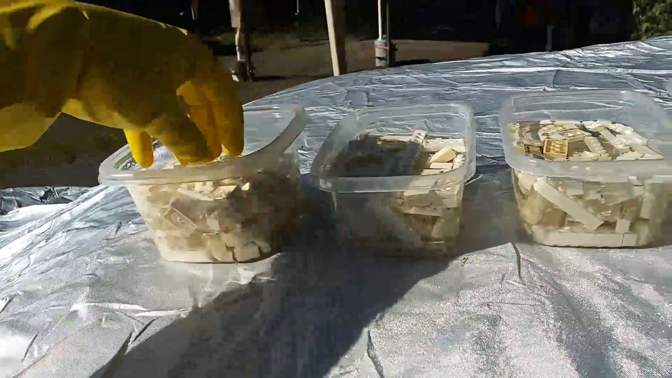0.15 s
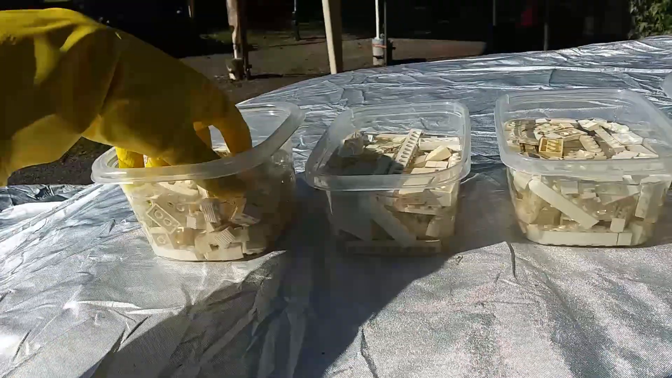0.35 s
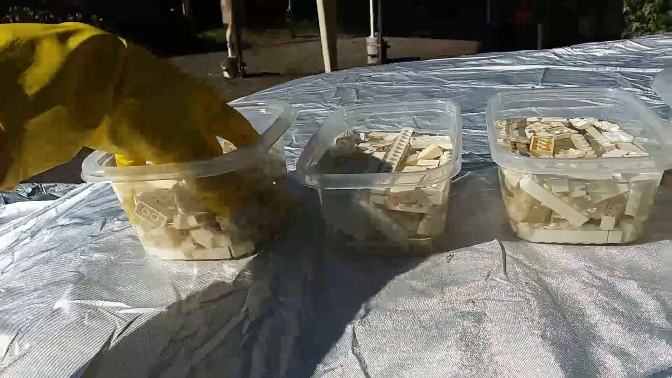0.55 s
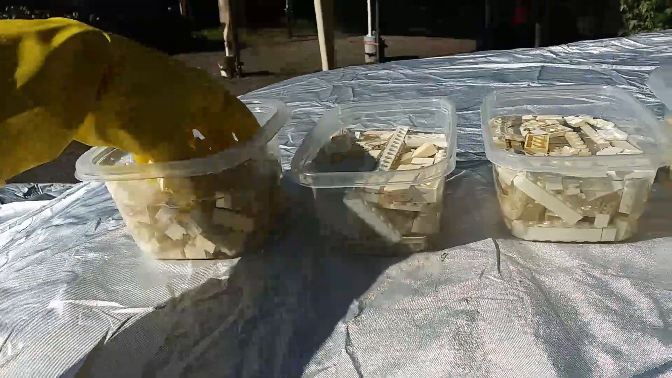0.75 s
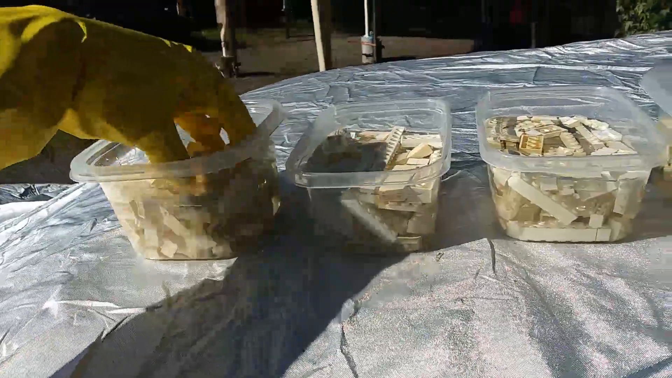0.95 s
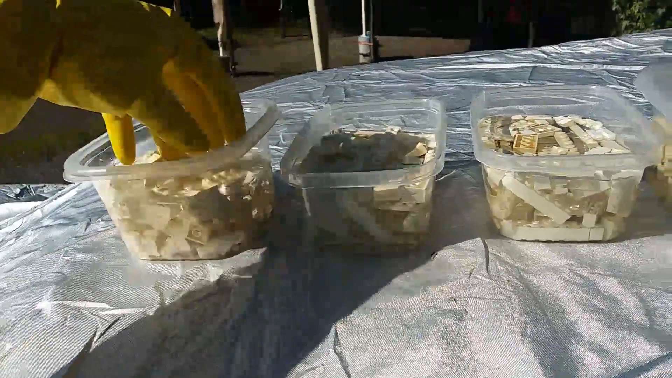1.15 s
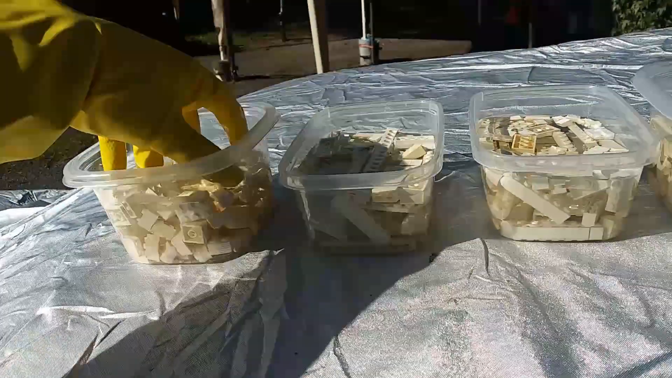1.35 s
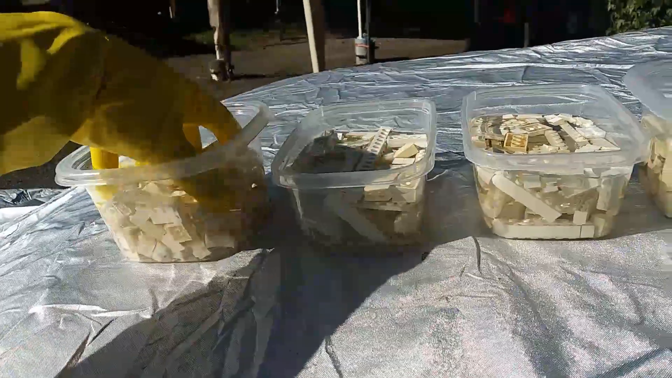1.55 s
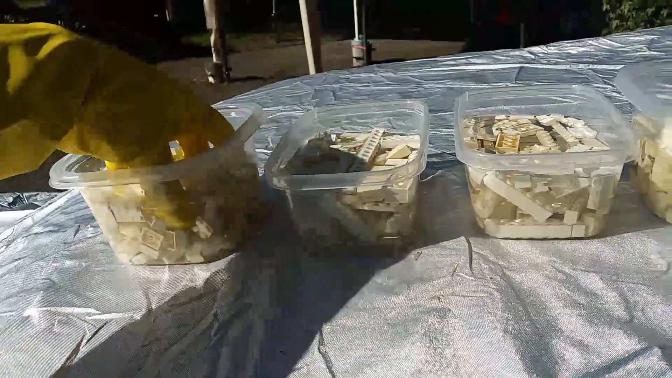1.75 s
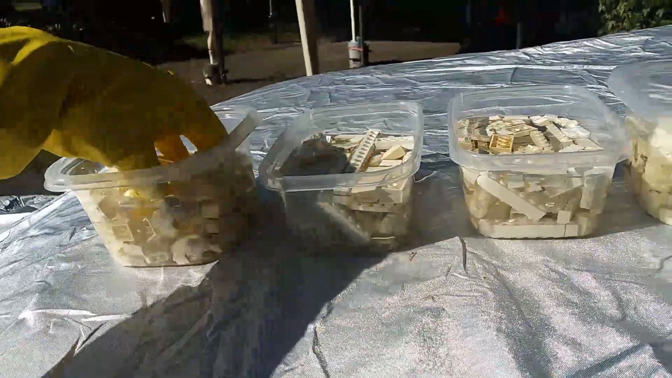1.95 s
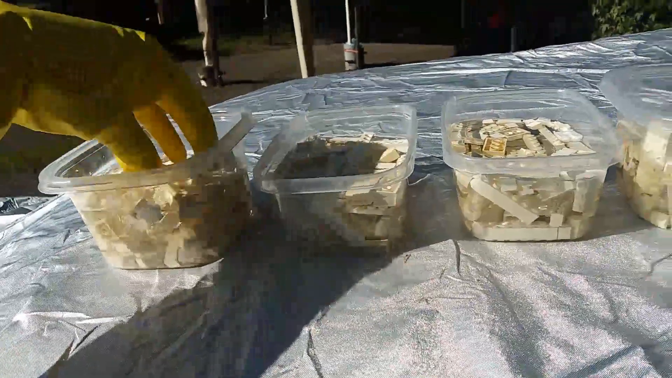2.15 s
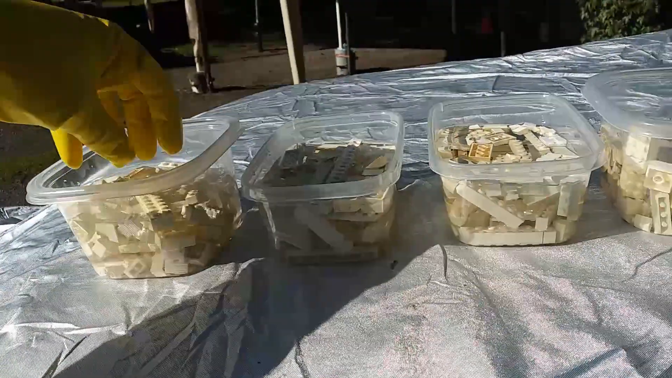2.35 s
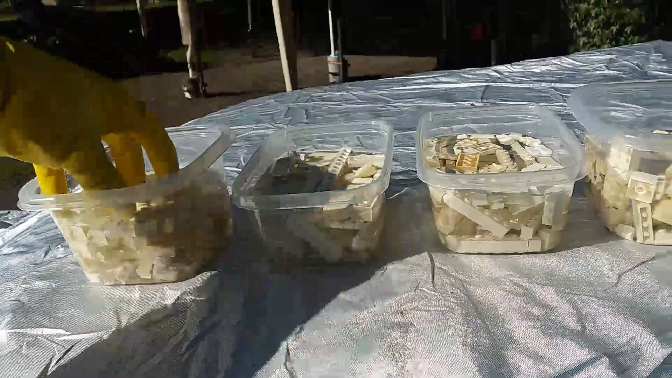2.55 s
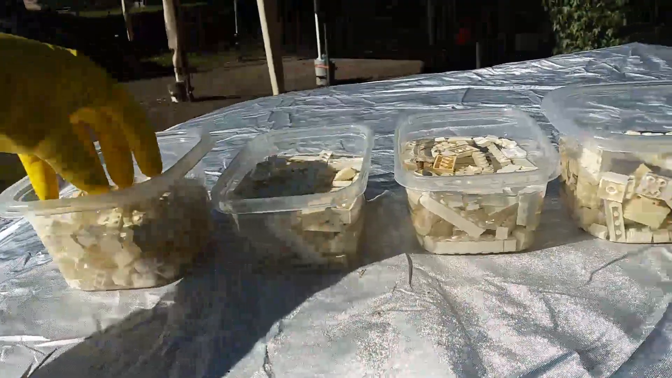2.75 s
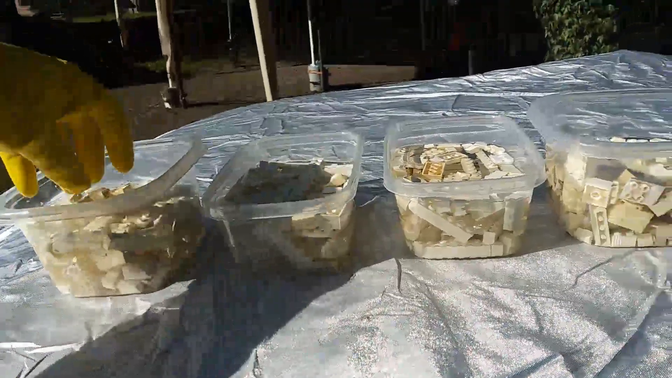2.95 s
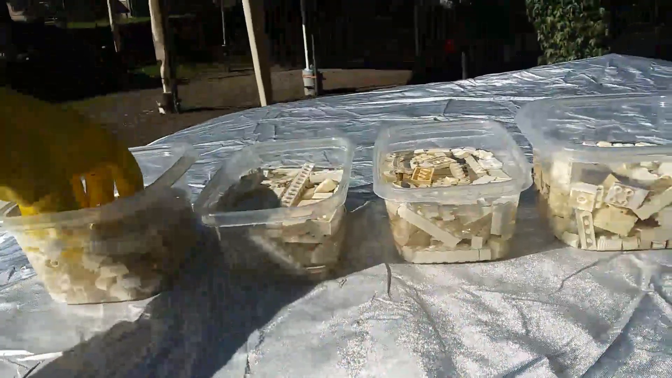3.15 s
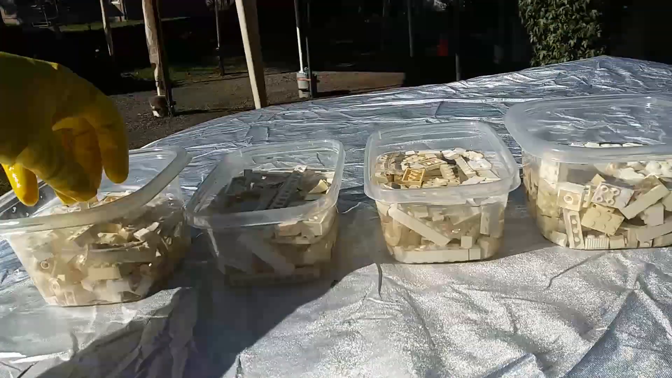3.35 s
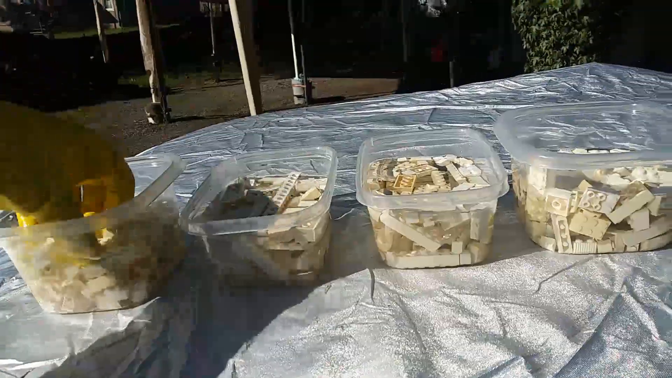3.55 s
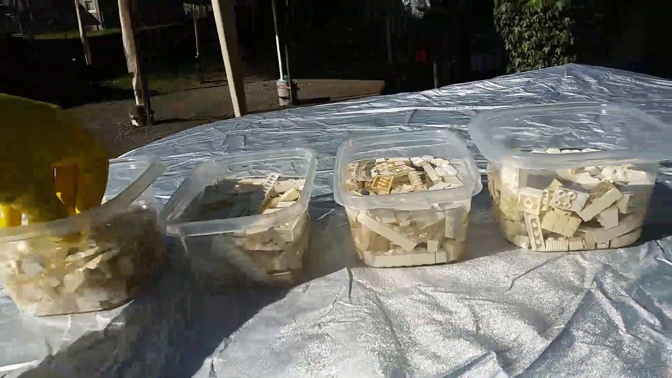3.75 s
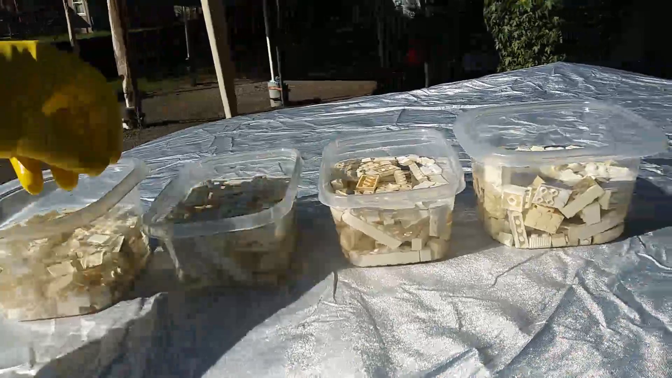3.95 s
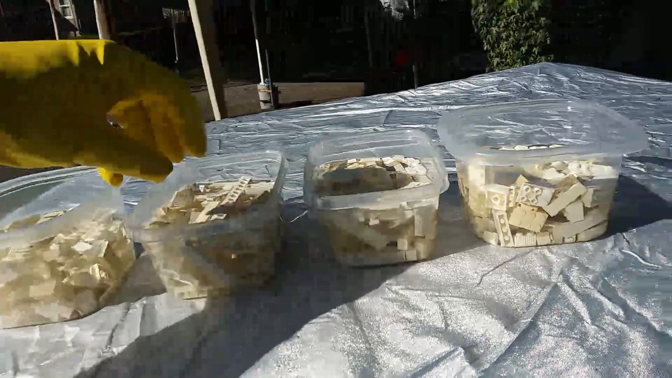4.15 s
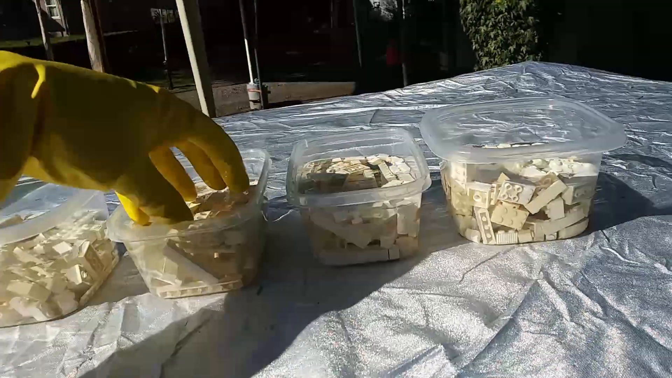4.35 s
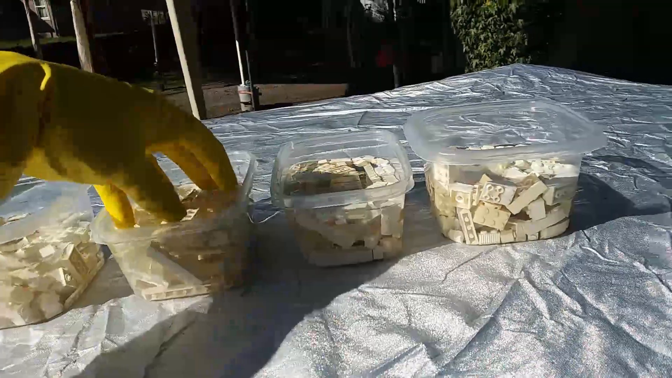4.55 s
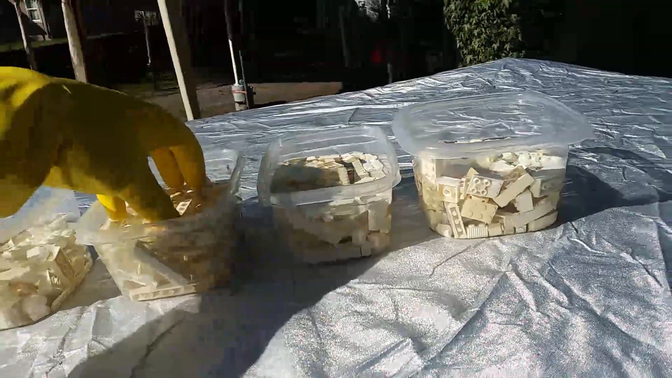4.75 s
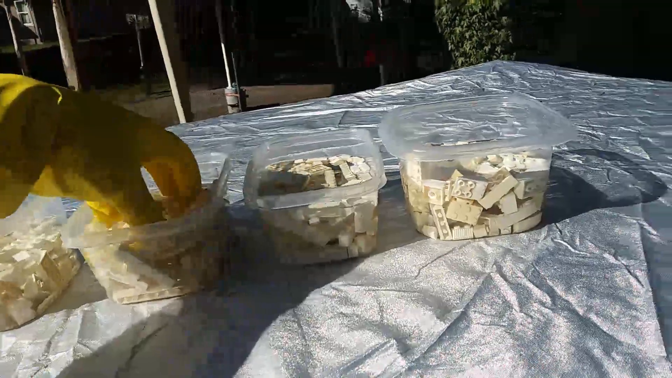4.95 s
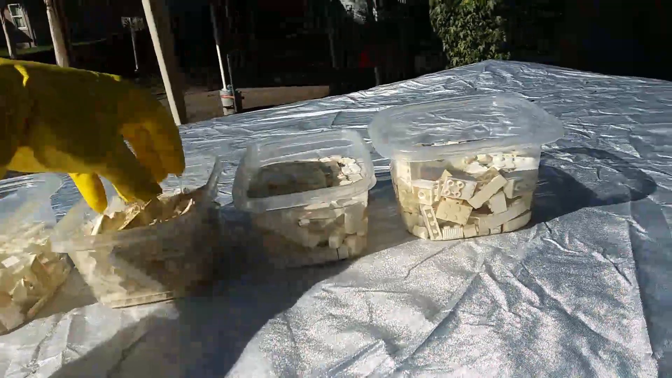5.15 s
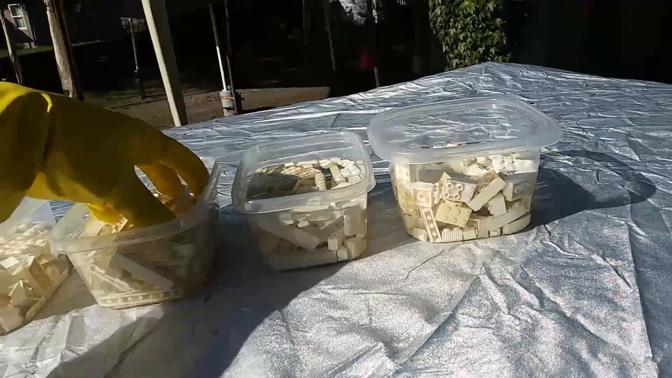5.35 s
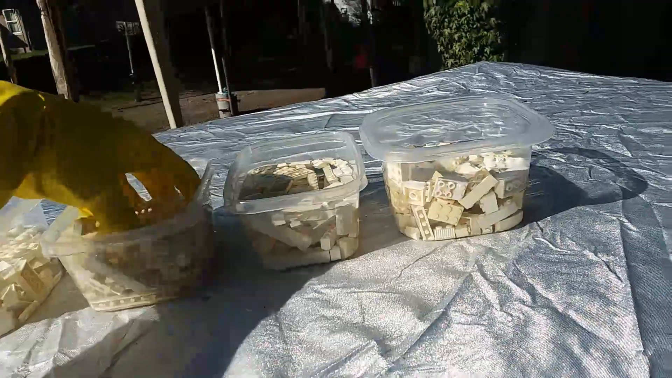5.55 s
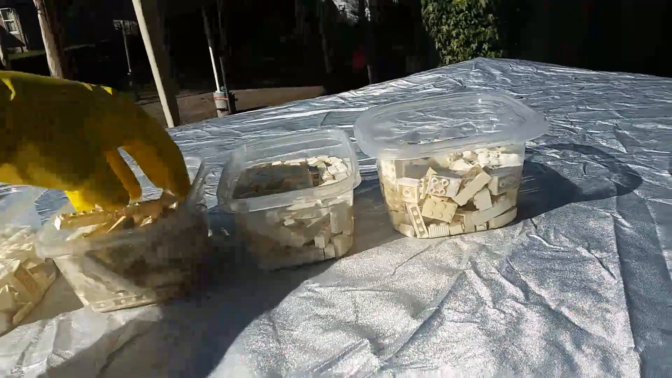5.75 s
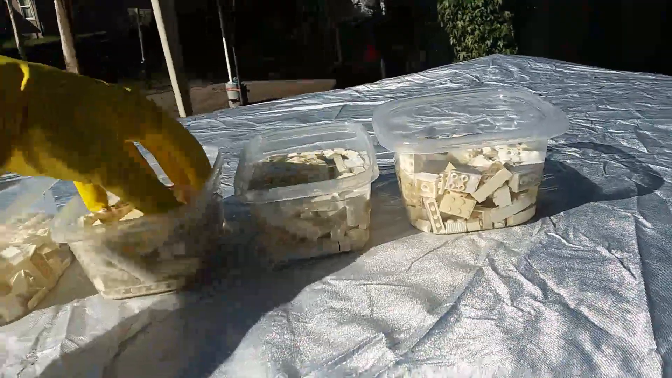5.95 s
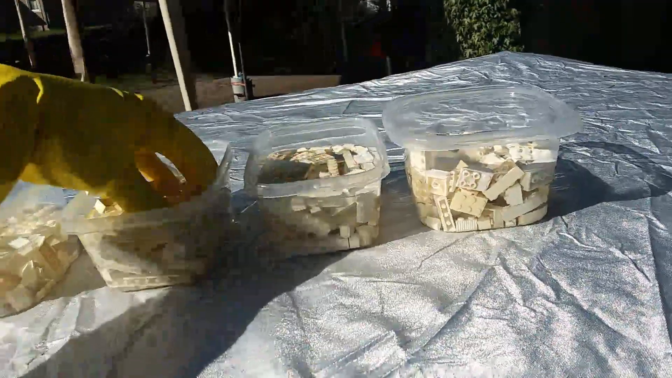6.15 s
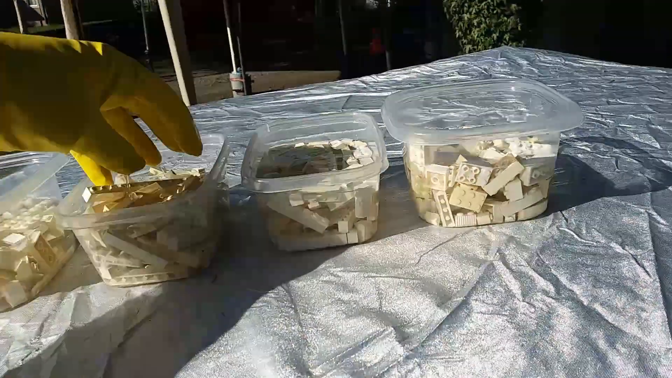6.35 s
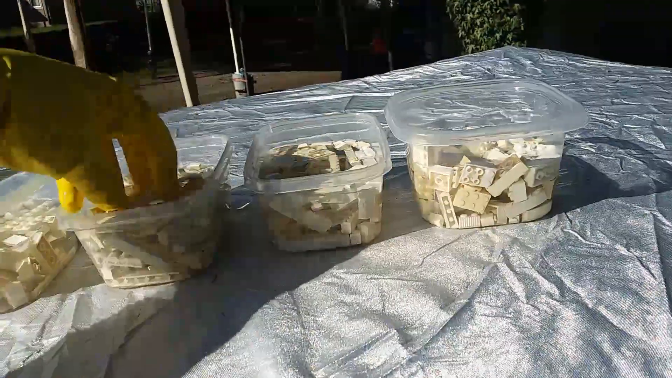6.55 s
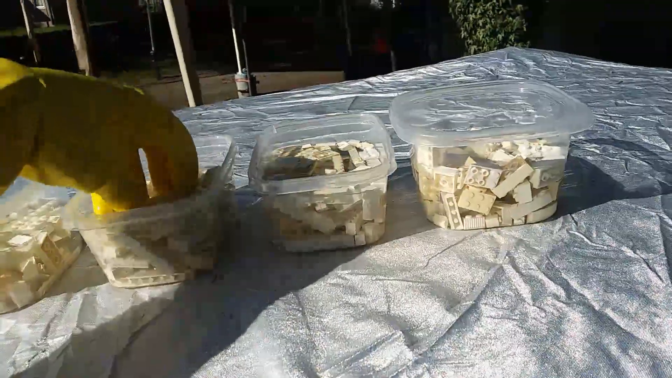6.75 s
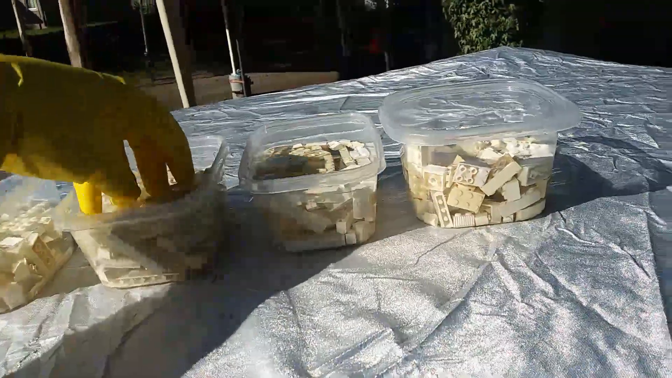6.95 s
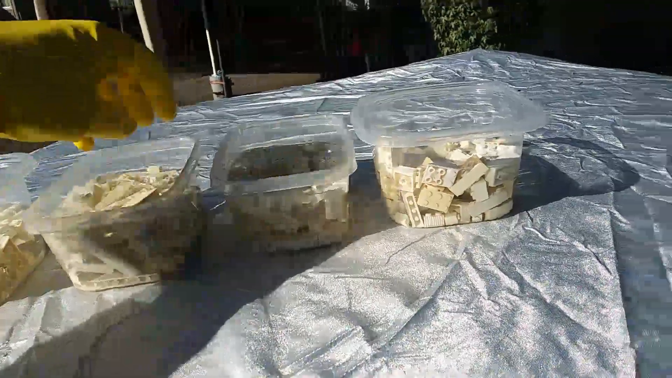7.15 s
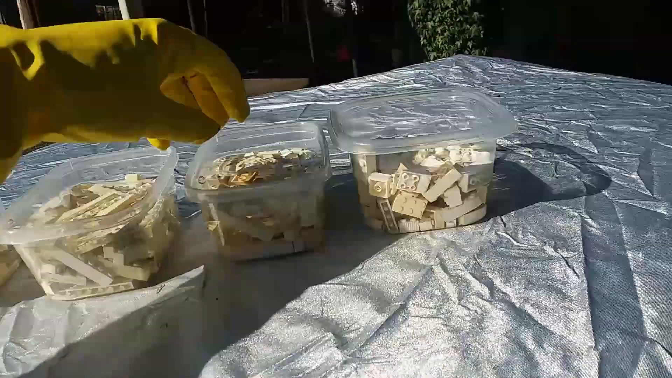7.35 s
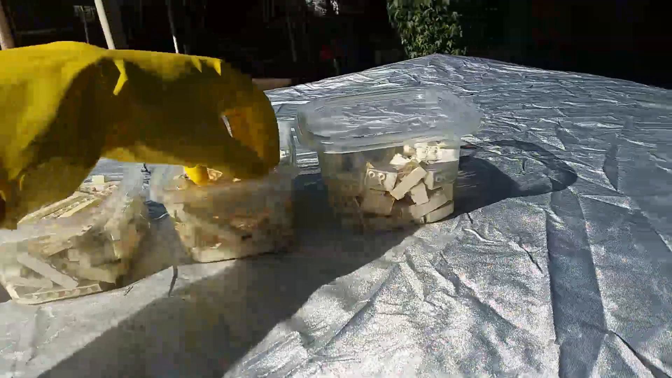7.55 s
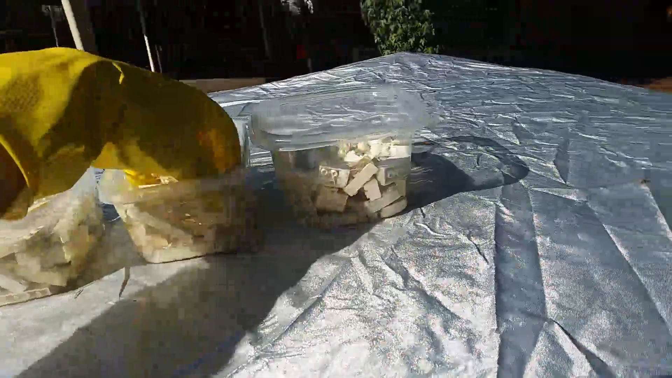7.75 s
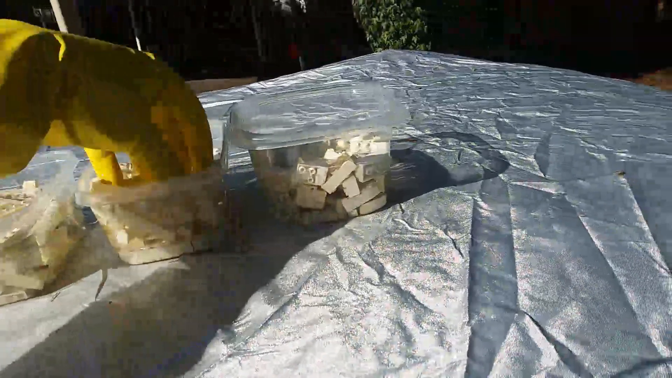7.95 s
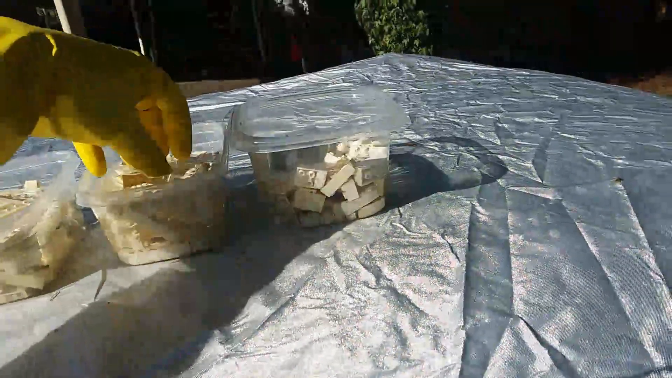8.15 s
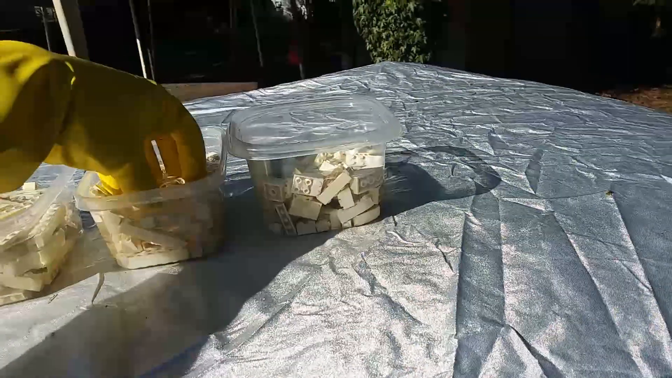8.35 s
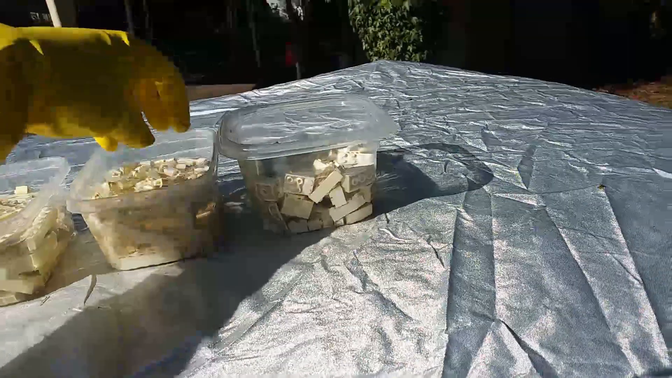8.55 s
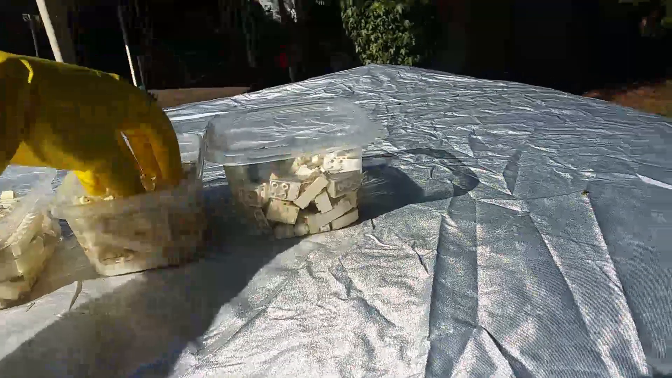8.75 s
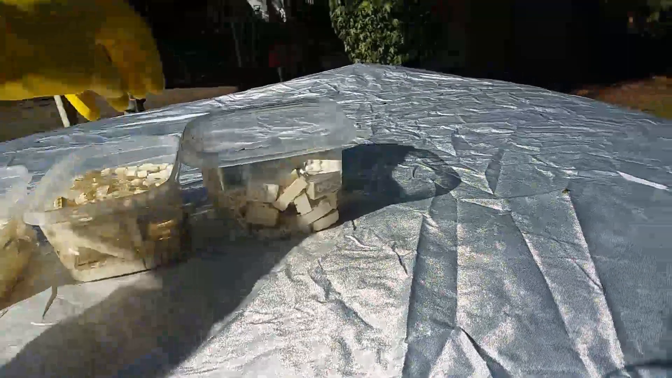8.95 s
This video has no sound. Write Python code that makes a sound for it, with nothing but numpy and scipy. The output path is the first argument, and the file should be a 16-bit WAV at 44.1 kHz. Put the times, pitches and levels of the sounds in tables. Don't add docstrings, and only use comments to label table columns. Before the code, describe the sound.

Wet hollow plastic bricks grind, clatter and knock in tubs of liquid as a hand pushes them down, close up outdoors, ending in a brief dripping fizz.

```python
import sys
import numpy as np
from scipy import signal
from scipy.fft import rfft, irfft, next_fast_len
from scipy.io import wavfile
from scipy.ndimage import uniform_filter1d, map_coordinates

SR = 44100
rng = np.random.default_rng(int(sys.argv[2]) if len(sys.argv) > 2 else 0)


def decibels_to_gain(level_db):
    exponent = np.asarray(level_db, float) / 20
    return 10 ** exponent


def log_audio(samples):
    frames = np.atleast_2d(samples).T
    limited = np.clip(frames, -1, 1)
    pcm = np.round(limited * 32767).astype(np.int16)
    wavfile.write(sys.argv[1], SR, pcm)


N = 397334

# frequency in Hz, level in dB per Hz.
HEAP_COLOUR = [(65, -68), (110, -41.5), (278, -11.5), (341, -10), (860, -1), (1150, -1.5), (1630, -13),
               (2510, -11), (2950, -13.5), (4280, -14.5), (5950, -34), (6870, -35), (7770, -52),
               (11000, -47.5), (15000, -74)]
# frequency in Hz, level in dB per Hz.
AIR_COLOUR = [(80, -38), (150, -13.5), (260, 0.5), (500, -9.5), (1000, -5), (1900, -22), (3000, -15.5),
              (5000, -23), (6500, -42), (9000, -73.5)]
AIR_DB = -55


def rms_one(x):
    return x / np.sqrt(np.mean(x ** 2) + 1e-30)


def at_hz(points, hz):
    points_hz, points_db = np.transpose(points)
    return np.interp(np.log(hz), np.log(points_hz), points_db)


def drift(rate):
    steps = rng.standard_normal(3000)
    return np.interp(np.arange(N) / SR * rate, np.arange(len(steps)), steps)


def resonate(x, hz, width_hz):
    r = np.exp(-np.pi * width_hz / SR)
    g = (1 - r * r) / 2
    stage = [g, 0, -g, 1, -2 * r * np.cos(2 * np.pi * hz / SR), r * r]
    return signal.sosfilt([stage, stage], x + 1e-18)


def coloured(spectrum):
    size = next_fast_len(N)
    hz = np.maximum(np.fft.rfftfreq(size, 1 / SR), 1)
    noise = rfft(rng.standard_normal(size))
    return rms_one(irfft(noise * decibels_to_gain(at_hz(spectrum, hz)), size)[:N])


def add(out, s, modes):
    t = np.arange(1500) / SR
    for hz, db, cycles, delay in modes:
        i = round((s + delay) * SR)
        envelope = (1 - np.exp(-t * hz / 0.78)) * np.exp(-t * hz / cycles)
        out[i:i + len(t)] += decibels_to_gain(db) * np.sin(2 * np.pi * hz * t) * envelope


def garden():
    return decibels_to_gain(AIR_DB + 0.96 * drift(2.97)) * coloured(AIR_COLOUR)


def mains_hum():
    hum_hz, hum_db = 118.6, -78
    return decibels_to_gain(hum_db) * np.sqrt(2) * np.sin(2 * np.pi * hum_hz * np.arange(N) / SR)


def insects():
    from_s, to_s, fade_s = 7.12, 7.55, 0.0796
    # band centre in Hz, width in Hz, level in dB.
    chorus = [(1200, 160, -68), (1830, 150, -63), (4342, 260, -68)]
    t = np.arange(N) / SR
    audible = np.clip(np.minimum(t - from_s, to_s - t) / fade_s, 0, 1)
    whir = 0
    for hz, width_hz, db in chorus:
        whir = whir + decibels_to_gain(db) * rms_one(resonate(rng.standard_normal(N), hz, width_hz))
    return audible * whir


def drain():
    # time in seconds, level in dB.
    flow = [
        (8.35, -71),
        (8.5, -54.5),
        (8.75, -53.5),
        (8.9, -47),
        (9.01, -51),
    ]
    # frequency in Hz, level in dB per Hz.
    fizz_colour = [(500, -28), (1300, 4), (2600, -6.5), (4800, -13.5), (6600, -62)]
    flow_db = np.interp(np.arange(N) / SR, *np.transpose(flow))
    return decibels_to_gain(flow_db + drift(25)) * coloured(fizz_colour)


def pings():
    # start in seconds, peak in dB, pitch in Hz.
    short_walls = [(0.9537, -24.5, 4515), (1.8497, -39.5, 4750), (3.4794, -29, 4280), (4.3939, -59.5, 4260),
                   (4.4623, -49, 4880), (6.8409, -51.5, 4100), (7.008, -61, 4710), (7.0334, -53, 5087),
                   (8.4622, -45.5, 4290), (8.5555, -50, 4000), (8.6622, -33.5, 3880)]
    out = np.zeros(N + SR)
    for s, peak_db, hz in short_walls:
        add(out, s, [(hz, peak_db - 1.0, 22.0, 0)])
    return out[:N]


def ticks():
    # start in seconds, peak in dB, pitch in Hz.
    edge_snaps = [(0.2167, -54.5, 6530), (0.258, -49.5, 6410), (0.3121, -53, 6580), (0.5542, -55, 6960),
                  (0.7967, -59, 6610), (0.9531, -56, 6610), (1.0362, -54.5, 7000), (1.1424, -50, 7030),
                  (1.1634, -46, 7060), (1.1838, -39, 7050), (1.3629, -52.5, 6630), (1.5176, -47, 6700),
                  (1.5986, -54, 6470), (1.7406, -50, 6660), (1.7598, -43, 6520), (1.858, -35, 6100),
                  (2.9853, -59, 6990), (3.4642, -50, 6700), (3.4697, -46, 6730), (3.4801, -38, 6720),
                  (3.4992, -41, 6400), (3.6198, -69.5, 6690),
                  (4.7314, -43, 6380), (4.7857, -47, 6740), (4.9648, -61, 6450), (4.9828, -56, 6400),
                   (5.09, -55, 6690), (5.2614, -57, 6630), (5.2892, -43.5, 6430), (5.4917, -56, 6500),
                   (5.6262, -53.5, 6800), (5.9082, -50.5, 6480), (5.9788, -36, 6750), (5.984, -29.5, 6360),
                   (6.071, -43.5, 8530), (6.1023, -48, 6520), (6.3492, -47, 6460), (6.5168, -38, 6970),
                   (6.5345, -23, 6240), (6.6026, -45.5, 6630), (6.7013, -52, 6870), (7.5634, -56, 6000),
                   (7.5637, -36.5, 6100), (7.5786, -43, 6860), (7.6697, -51.5, 6470), (7.9006, -56, 6700),
                   (7.9246, -42, 6960), (7.9311, -38.5, 6110), (7.9351, -32.5, 6900), (8.184, -49, 6720),
                   (8.638, -49.5, 6570), (8.641, -44.5, 6330)]
    out, snaps = np.zeros(N + SR), edge_snaps
    for (s, peak_db, hz), chance in zip(snaps, rng.random((len(snaps), 16))):
        modes = [(hz, peak_db + 0.5, 18.0, 0)]
        for f, late in zip(4500 * 2.8 ** chance[:8], chance[8:]):
            modes.append((f, peak_db - 7.0 - f / 2600, 12.0, 0.0033 * late ** 2))
        add(out, s, modes)
    return out[:N]


def knocks():
    # start in seconds, peak in dB, cavity in Hz, brick walls in dB.
    tub_knocks = [(0.191, -32, 1066, -24), (0.232, -17.5, 1104, -18), (0.301, -21, 790, -14.5),
                  (0.536, -21, 925, -15.5), (0.67, -18.5, 1041, -9), (1.007, -21.5, 1200, -13),
                  (1.161, -24.5, 853, -2.5), (1.274, -17, 1070, -18.5), (1.35, -15.5, 1123, -11),
                  (1.543, -23, 907, -14), (1.628, -14, 1137, -13), (1.85, -18.5, 1280, -11.5),
                  (1.993, -26, 790, -9), (2.077, -30.5, 820, -11), (2.145, -19.5, 1085, -15),
                  (2.219, -23.5, 1109, -14), (2.461, -27.5, 1075, -10), (2.506, -26.5, 1081, -30),
                  (2.534, -21, 968, -17), (2.606, -21, 1150, -12.5), (2.723, -25, 835, -14.5),
                  (2.78, -28, 1060, -16), (2.973, -25, 820, -16), (3.004, -16.5, 1170, -24.5),
                  (3.035, -11.5, 937, -19), (3.421, -25.5, 546, -17), (3.451, -22, 522, -4.5),
                  (3.482, -15, 977, -5.5), (3.522, -14.5, 1145, -11), (3.674, -32.5, 860, -21),
                  (4.708, -24.5, 775, -10.5), (4.73, -19, 895, -9), (4.829, -23.5, 765, -12),
                  (4.882, -22, 719, -13), (4.963, -27, 803, 1.5), (5.087, -26, 1250, -1),
                  (5.117, -26, 671, -30), (5.256, -17.5, 1500, -7.5), (5.316, -14, 1150, -11.5),
                  (5.417, -23.5, 809, -11), (5.461, -23, 587, -21.5), (5.491, -15, 963, -11.5),
                  (5.521, -13.5, 1120, -19.5), (5.625, -20.5, 864, -8), (5.671, -28.5, 875, -3.5),
                  (5.818, -30.5, 912, -26), (5.858, -36, 1070, -14), (5.888, -24, 860, -15),
                  (5.912, -23.5, 939, -10.5), (5.947, -23, 883, -11.5), (6.09, -25, 936, -6),
                  (6.176, -28, 850, -20), (6.241, -32, 872, -22), (6.361, -27, 927.6, -18),
                  (6.515, -13, 895, -13), (6.602, -24.5, 1030, -1.5), (6.681, -22.5, 899, -12.5),
                  (6.739, -26, 926, -22.5),
                  (7.546, -39, 958, -15.5), (7.568, -26, 1320, -17.5), (7.589, -26.5, 776, -20),
                 (7.648, -25.5, 726, -15), (7.673, -20, 1040, -14), (7.701, -29.5, 601, -11.5),
                 (7.733, -28, 1069, -14), (7.76, -22, 1007, -23), (7.859, -28.5, 1173, -22),
                 (7.866, -26, 710, -20.5), (8.009, -30.5, 1120, -7), (8.212, -20.5, 1470, -11.5),
                 (8.245, -27.5, 759, -2.5), (8.288, -26.5, 925, -9), (8.663, -23, 972, -9.5)]
    # start in seconds, peak in dB, cavity in Hz, brick walls in dB.
    settling = [(3.773, -34, 1067, -13), (3.785, -37.5, 547, -16), (3.89, -31.5, 780, -16),
                (3.929, -35.5, 944, -28), (3.962, -42, 910, -30), (4.11, -33, 876, -23),
                (4.134, -38.5, 990, -15), (4.207, -35, 850, -34), (4.329, -40.5, 775, -27),
                (4.395, -44.5, 1120, -7), (4.462, -39.5, 747, -5), (4.043, -37.5, 950, -22),
                (4.063, -28.5, 834, -26.5), (6.822, -35, 1010, -33.5), (6.879, -28, 990, -8),
                (6.929, -39, 925, -15), (7.008, -33.5, 814, -19), (8.676, -21.5, 1140, -15),
                (8.955, -37, 1900, -1), (8.999, -37, 1530, -17)]
    out, blows = np.zeros(N + SR), tub_knocks + settling
    for (s, peak_db, hz, wall_db), chance in zip(blows, rng.random((len(blows), 16))):
        modes = [(hz, peak_db + 1.0, 2.696 + 2.5 * chance[0], 0),
                 (hz * (.7 + .6 * chance[1]), peak_db - 6.0, 5.0, 0.005094 * chance[2])]
        for f, late in zip(1750 * 3.0 ** chance[4:10], chance[10:]):
            tilt_db = .5 * (at_hz(HEAP_COLOUR, f) - at_hz(HEAP_COLOUR, 3000))
            modes.append((f, peak_db + wall_db - 3.0 + tilt_db, 9.0, .008 * late ** 2))
        add(out, s, modes)
    return out[:N]


def stirring(t, steepness, dry_share):
    # crest in seconds, crest in dB, seconds to rise 20 dB,
    # seconds to settle 20 dB, dry bricks on top in dB.
    pushes = [(0.01, -33.5, .05, 0.2, 2.5), (0.231, -28, 0.06, 1.77, -4),
              (0.399, -31.5, 0.44, 1.25, -1), (0.601, -29, 0.37, 1.3, -2),
              (0.78, -33.5, 0.52, 0.07, 2.0), (0.95, -44, .05, 4.3, 0.5),
              (1.03, -31.5, 0.2933, 1.7, 1.5), (1.18, -28, 0.0031, 0.66, 4),
              (1.39, -26, 0.13, 0.28, 0.67), (1.561, -23.5, 0.1448, 0.59, 2.5),
              (1.75, -26.5, 0.11, .5, 4), (2.101, -36, 0.75, 0.54, -0.4),
              (2.542, -27, 0.08, 0.62, -3.5), (3.042, -24, 0.0657, 0.46, 0),
              (3.5, -23.5, 0.1135, 0.3929, 2), (4.08, -47.5, 0.3, 1.69, -12.5),
              (4.462, -47, 0.271, 0.49, -6.5), (4.739, -25.5, .04, 0.4, 4),
                    (4.98, -31, .04, .35, 4.0), (5.13, -34, .12, .15, 1.62), (5.291, -24.5, .06, .12, 7.5),
                    (5.52, -25, 0.1113, 0.66, 3), (5.972, -25.5, 0.12, 0.36, 3.5),
                    (6.17, -36, 0.17, .25, 3), (6.37, -38, 0.071, .08, 4.5),
                    (6.539, -26.5, 0.0434, 0.377, 4.5), (6.92, -40, 0.2, 0.18, 1),
                    (7.27, -50.5, .08, .1, -8), (7.589, -29.5, .045, 0.53, 4.5),
                    (7.931, -30, 0.097, .15, 11), (8.25, -32.5, 0.19, 0.4, 4.5),
                    (8.669, -35.5, .08, .15, 3.5)]
    crest_s, tail_db = 0.22, -4
    s, db, rise_s, settle_s, dry_db = np.transpose(pushes)[:, :, None]
    after = np.clip(t - s, 0, 3)
    crest_fall_db = -20 * after / np.minimum(crest_s, settle_s)
    fall_db = np.maximum(crest_fall_db, tail_db - 20 * after / settle_s)
    rise_db = -20 * (np.minimum(t - s, 0) / rise_s) ** 2
    push_db = db + dry_share * dry_db + rise_db + steepness * fall_db
    return 10 * np.log10(np.sum(decibels_to_gain(np.maximum(push_db, -140)) ** 2, axis=0))


def rattle(per_s, spread_db, clump_db, scatter_db, sharpness):
    # start in seconds, boom in dB.
    tubs = [
        (0, -6.5),
        (3.35, -5.5),
        (4.6, 1),
        (7.5, 2),
    ]
    boom_to_hz, wall_from_hz, short_from_hz, edge_from_hz = 340, 1650, 3050, 6050
    t, s = np.arange(N) / SR, np.arange(0, N / SR + .01, .004)
    tub_db = stirring(s, 1, 0)
    busy = decibels_to_gain(.15 * (np.interp(t, s, tub_db) + 33))
    at = np.flatnonzero(rng.random(N) < per_s * busy * decibels_to_gain(clump_db * drift(45)) / SR)
    size_db = spread_db * np.minimum(rng.exponential(1, N)[at], 4.5)
    blow = 1.01 * rng.choice([-1, 1], N)[at]
    pitches = np.geomspace(120, 14500, 60)
    from_s, boom_db = np.transpose(tubs)
    tub_now = np.maximum(np.searchsorted(from_s, s, "right") - 1, 0)
    boom_db = tub_db + boom_db[tub_now]
    parts = [(0, boom_db, .6, -17.0),
             (boom_to_hz, tub_db, .8, -2.5),
             (wall_from_hz, stirring(s, 1.114, 0.2), .9, -11.5),
             (short_from_hz, stirring(s, 1.367, 0.91), 1.05, -17.5),
             (edge_from_hz, stirring(s, 1.39, 1.74), 1.45, -47.0)]
    tops = [p[0] for p in parts[1:]] + [SR]
    out = 0
    for (low, level_db, hardness, share_db), high in zip(parts, tops):
        level = decibels_to_gain(np.interp(t, s, level_db))
        force = level[at] / np.sqrt(busy[at]) * decibels_to_gain(hardness * size_db)
        part = 0
        for k, hz in enumerate(pitches[(pitches >= low) & (pitches < high)]):
            clicks = np.zeros(N)
            own_blow, own_size = rng.standard_normal((2, 20000))[:, at % 20000]
            clicks[at] = force * (blow * (-1) ** k + own_blow) * decibels_to_gain(scatter_db * own_size)
            part = part + decibels_to_gain(at_hz(HEAP_COLOUR, hz)) * resonate(clicks, hz, hz / sharpness)
        out = out + decibels_to_gain(share_db) * rms_one(part) * np.sqrt(np.mean(level ** 2))
    return out


def scene():
    air = garden() + mains_hum()
    heap = rattle(per_s=1900, spread_db=4.0, clump_db=4.0, scatter_db=4.5, sharpness=13.22)
    heap = heap + knocks() + ticks() + pings() + drain()
    return (heap + air + insects())[None]


def suppress(x, over, depth_db, error_db):
    hz, _, z = signal.stft(x, SR, nperseg=1024, noverlap=768)
    learnt = decibels_to_gain(at_hz(AIR_COLOUR, np.maximum(hz, 1))) ** 2
    learnt *= decibels_to_gain(AIR_DB) ** 2 * 3 / 4 / learnt.sum()
    grid = np.meshgrid(np.sqrt(hz) / 3.5, np.arange(z.shape[1]) / 22, indexing="ij")
    wander = map_coordinates(rng.standard_normal((45, 75)), grid, order=1)
    power = uniform_filter1d(np.abs(z) ** 2, size=5, axis=0)
    power = signal.lfilter([.3], [1, -.7], power, axis=1)
    gain = 1 - over * learnt[:, None] * decibels_to_gain(error_db * wander) ** 2 / (power + 1e-20)
    return signal.istft(z * np.maximum(gain, decibels_to_gain(depth_db)), SR, nperseg=1024, noverlap=768)[1][:N]


def low_pass(x):
    return signal.sosfilt(signal.butter(12, 15750, fs=SR, output="sos"), x)


def record(dry):
    # centre in Hz, width in Hz.
    port_notches = [(6050, 380), (7800, 360)]
    # frequency in Hz, level in dB per Hz.
    rest_colour = [(25, -55.5), (80, -47), (130, -18), (250, -0.5), (400, -19.5), (800, -24), (3000, -37.5),
                   (6000, -44.5), (12300, -47.5), (12800, -73)]
    low_cut_hz, rest_db = 119.7, -62.5
    x = signal.sosfilt(signal.butter(2, low_cut_hz, "high", fs=SR, output="sos"), dry[0])
    for hz, width_hz in port_notches:
        x = signal.lfilter(*signal.iirnotch(hz, hz / width_hz, SR), x)
    x = suppress(x, over=1.79, depth_db=-27.0, error_db=1.9)
    x = x + decibels_to_gain(rest_db) * coloured(rest_colour)
    return low_pass(x[None])


dry = scene()
out = record(dry)
log_audio(out)
```